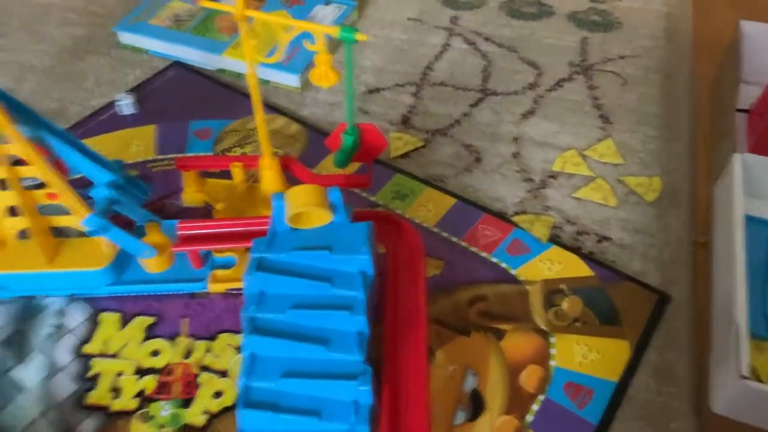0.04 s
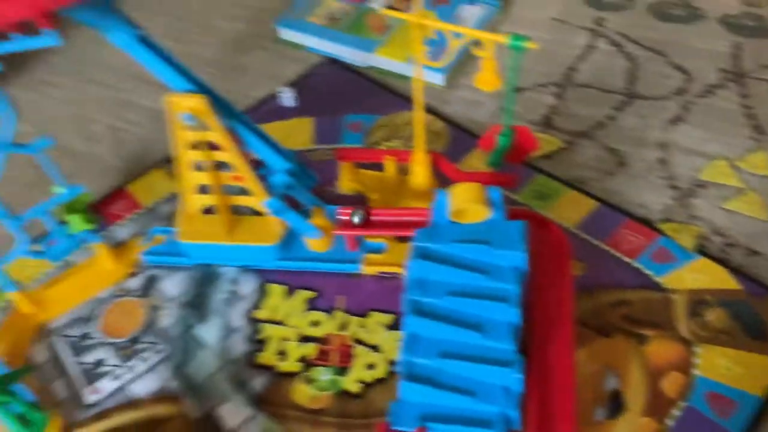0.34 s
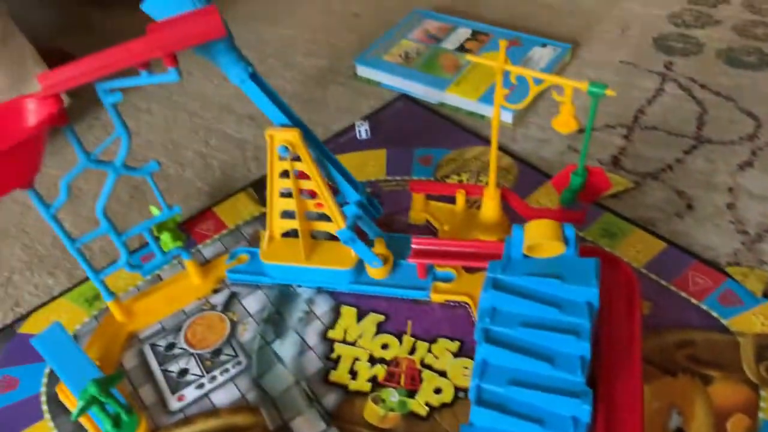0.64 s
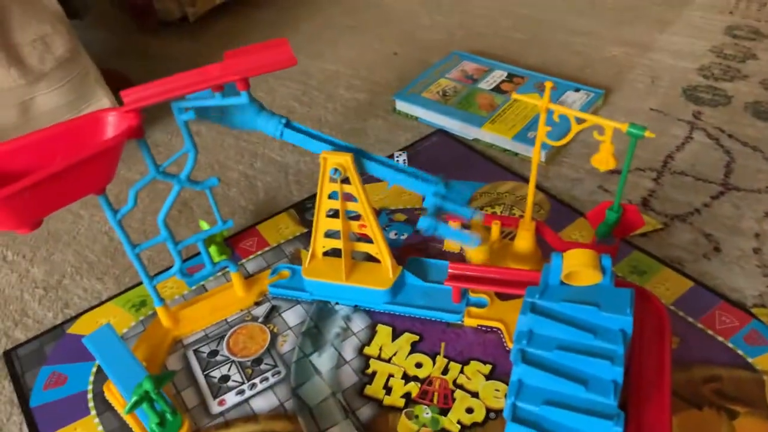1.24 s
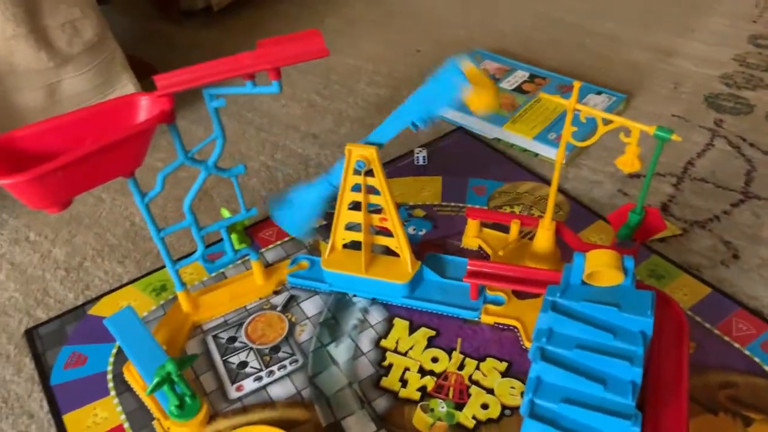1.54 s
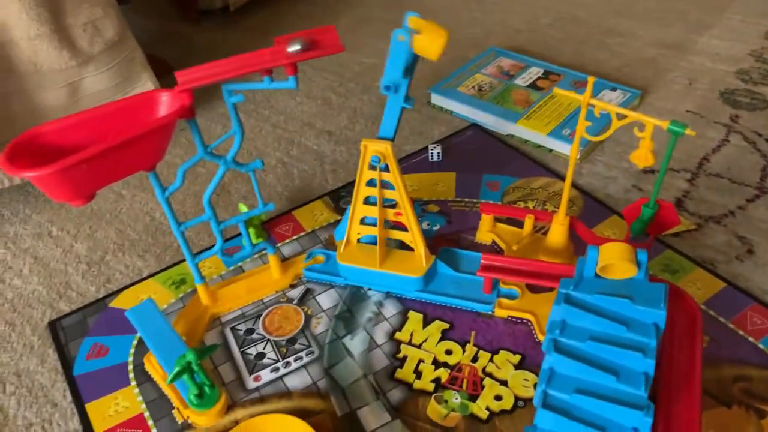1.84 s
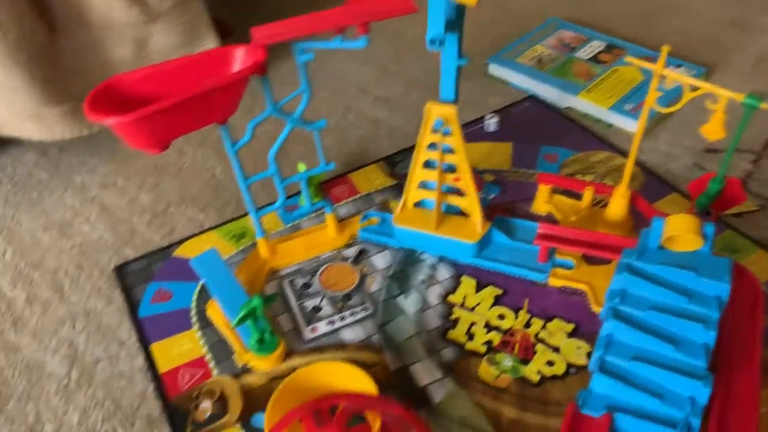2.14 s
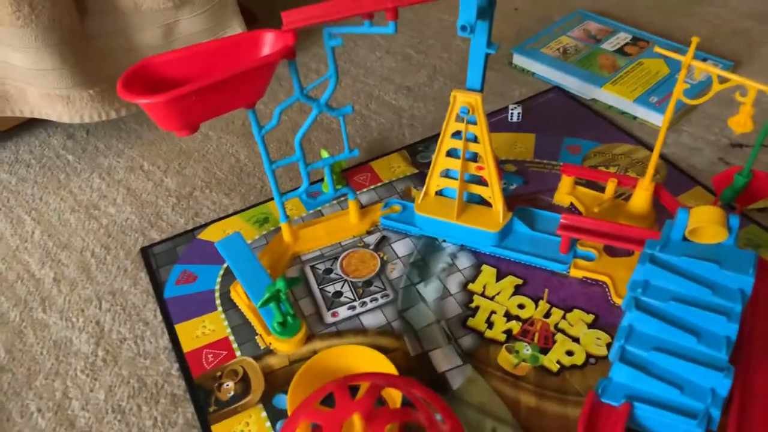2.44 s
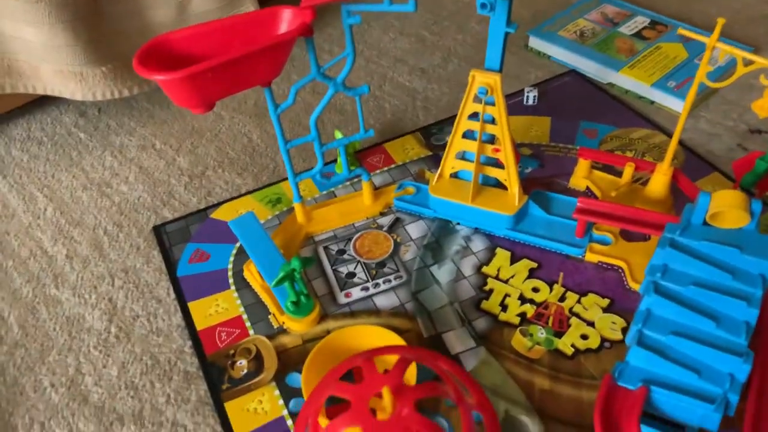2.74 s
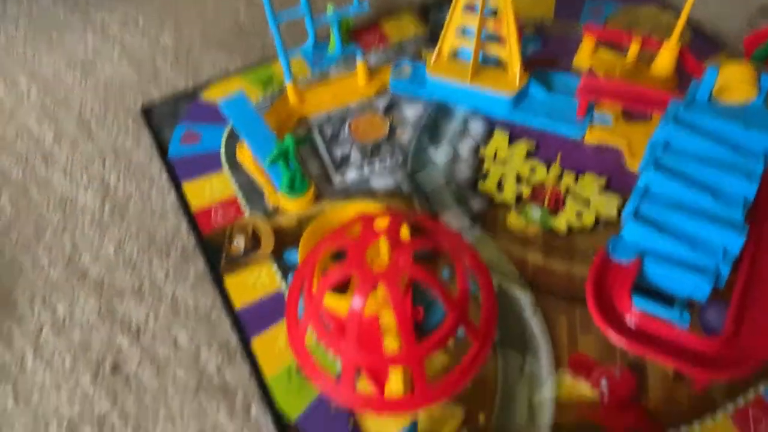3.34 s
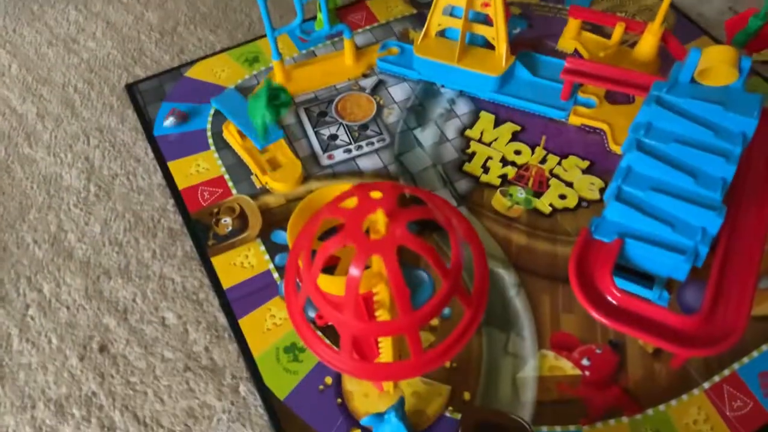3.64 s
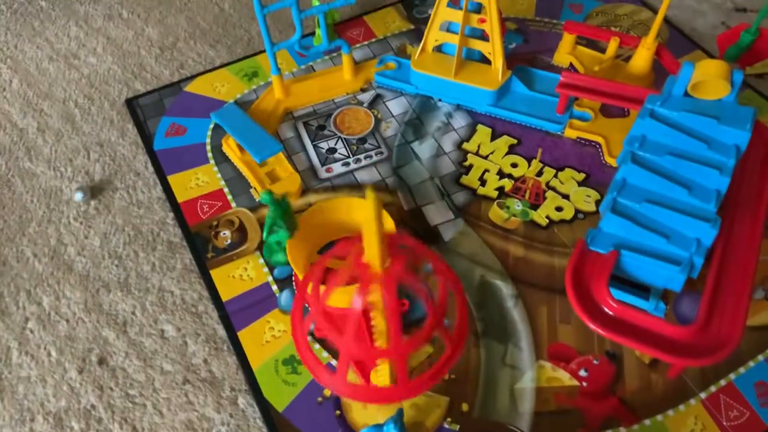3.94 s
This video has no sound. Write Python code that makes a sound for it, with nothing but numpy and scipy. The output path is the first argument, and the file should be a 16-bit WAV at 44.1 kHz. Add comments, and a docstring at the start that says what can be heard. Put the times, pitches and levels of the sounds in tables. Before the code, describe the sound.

Plastic clatter from a toy contraption on a game board: dull knocks and a short roll, light lever rattling, a ball bouncing and circling in a little tub, then a bright clack and a chattering cage. Close microphone, quiet room.

```python
"""Chain-reaction toy on a game board

A plastic toy runs its course in a quiet, carpeted room, heard on one microphone close by.
A steel ball knocks down a stair, rolls along a gutter and trips a lever, whose rattle tips a second
ball into a tub. That ball swirls, drops on a see-saw plank, and a cage chatters down its post.
Knocks cross the board as falling chirps."""
import sys
import numpy as np
from scipy import signal
from scipy.fft import rfft, irfft
from scipy.io import wavfile
from scipy.ndimage import map_coordinates

SR = 44100
rng = np.random.default_rng(int(sys.argv[2]) if len(sys.argv) > 2 else 0)


def persist_wave(psi):
    """Save psi, clipped to +-1, as 16-bit WAV."""
    counts = np.round(np.clip(psi, -1, 1) * 32767).astype(np.int16)
    wavfile.write(sys.argv[1], SR, np.atleast_2d(counts).T)


N = 176400
BLOW_SIZE = 4096  # samples; a blow's onset lies an eighth of the way in


def undb(db):
    return 10 ** (np.asarray(db) / 20)


def unit_rms(x):
    return x / np.sqrt(np.mean(x ** 2))


def on_log(points, hz):
    """Read (frequency [Hz], value) points on a log-frequency axis."""
    p = np.array(points, float)
    return np.interp(np.log(np.maximum(hz, 1)), np.log(p[:, 0]), p[:, 1])


def freqs(size):
    return np.maximum(np.arange(size // 2 + 1) * SR / size, 1)


def colour(x, points):
    """Filter by (frequency [Hz], gain [dB]) points."""
    return irfft(rfft(x) * undb(on_log(points, freqs(len(x)))), len(x))


def walk(per_s):
    """Smooth random wandering with a spread near 1."""
    steps = rng.standard_normal(int(per_s * N / SR) + 2)
    return np.interp(np.arange(N) * per_s / SR, np.arange(len(steps)), steps)


def add(out, at_s, blow):
    """Mix in a blow with its onset at at_s."""
    i = int(at_s * SR) - len(blow) // 8
    a, b = max(i, 0), min(i + len(blow), max(i, N))
    out[a:b] += blow[a - i:b - i]


def voice(spectrum, edges_hz, band_db, lag_ms):
    """Give a blow its strength in three bands (rms over 10 ms); bending waves bring the lows late."""
    hz = freqs(BLOW_SIZE)
    low, high = (1 / (1 + (hz / edge) ** 8) for edge in edges_hz)
    out = 0
    for share, db in zip((low, high - low, 1 - high), band_db):
        band = spectrum * share
        out = out + band * undb(db) / np.sqrt(np.sum(irfft(band) ** 2) / (.01 * SR))
    phase = 4 * np.pi * lag_ms * (np.sqrt(hz / 1000) - hz / 4000)
    return np.roll(irfft(out * np.exp(-1j * phase)), BLOW_SIZE // 8)


def rolling(curve, rings, bumps_per_s, spread_db, top_hz):
    """Tiny bumps under a rolling or sliding contact excite the plastic's resonances."""
    t, hz = np.arange(N) / SR, freqs(N)
    bumps = (rng.random(N) < bumps_per_s / SR) * rng.standard_normal(N)
    bumps *= undb(spread_db * np.minimum(rng.exponential(size=N), 2))
    bumps *= undb(2.5 * walk(per_s=70))  # uneven pressure
    body = sum(undb(db) / (1 + 1j * (hz / f - f / hz) * f / width) for f, width, db in rings)
    sound = irfft(rfft(bumps) * body / (1 + (hz / top_hz) ** 4), N)
    drift = 1 + .04 * walk(per_s=10)  # resonances shift as the contact moves
    sound = map_coordinates(sound, [np.cumsum(drift)], mode="mirror")
    at_s, db = np.array(curve).T
    return unit_rms(sound) * undb(np.interp(t, at_s, db)) * (t > at_s[0] - .03) * (t < at_s[-1])


def accent(at_s, hz):
    """Extra dB for the modes that a blow's landing spot favours."""
    spots = [(1.671, 2110), (1.7625, 3850), (2.1935, 2150), (2.2986, 2150)]  # accented blows (time [s], favoured frequency [Hz])
    return sum(10 * np.exp(-(np.log(hz / f) / .13) ** 2) for s, f in spots if abs(s - at_s) < .005)


def clacks(hits, modes, crack_db, crack_s, lag_ms, detune, bounce_db):
    """Each hit is a crack of chattering contact plus the part's modes; two fainter bounces follow."""
    crack_colour = [(150, -4.5), (400, 4), (1000, 9.5), (2500, 10.5), (5000, 3), (8000, -2.5), (10500, -9),
                    (13000, -17), (16000, -37)]  # contact spectrum (frequency [Hz], gain [dB])
    t, out = np.arange(BLOW_SIZE) / SR, np.zeros(N)
    hz, db, t60 = np.array(modes, float).T[:, :, None]
    sign = (-1) ** np.arange(len(hz))[:, None]
    fade = np.clip(4 - 5 * t / t[-1], 0, 1)
    crack_envelope = np.exp(-t / crack_s) * np.minimum(t / .00034, 1)
    for at_s, *band_db in hits:
        for contact_db in (0, bounce_db, bounce_db * 1.5):
            weight, shift = rng.standard_normal((2, len(hz), 1))
            decays = undb(db + accent(at_s, hz) + 2.5 * weight - 60 * t / t60)
            partials = sign * decays * np.sin(2 * np.pi * hz * (1 + detune * shift) * t)
            ring = fade * partials.sum(axis=0)
            crack = colour(rng.standard_normal(BLOW_SIZE) * crack_envelope, crack_colour)
            spectrum = rfft(unit_rms(ring) + undb(crack_db) * unit_rms(crack))
            add(out, at_s, undb(contact_db) * voice(spectrum, (1100, 5000), band_db, lag_ms))
            at_s += rng.uniform(.003, .011)
    return out


def room_tone():
    """The room's quiet hum: steady noise, mostly bass."""
    spectrum = [(30, -25.5), (65, 0), (140, -3), (300, -11.5), (650, -21.5), (1200, -26), (2500, -27),
                (4500, -40.5), (10000, -44), (15000, -63)]  # hum (frequency [Hz], gain [dB])
    return undb(-56) * unit_rms(colour(rng.standard_normal(N), spectrum))


def gutter_roll():
    """The steel ball rumbles along the plastic gutter."""
    curve = [(0, -52), (.08, -49), (.16, -52.5), (.24, -52.5), (.33, -45.5), (.39, -61), (.45, -67),
             (.6, -74)]  # roll (time [s], level [dB])
    rings = [(600, 230, 15), (713, 140, 5), (1180, 70, 0.5), (1410, 110, 7), (2100, 160, 1)]  # gutter resonances (frequency [Hz], width [Hz], gain [dB])
    return rolling(curve, rings, bumps_per_s=3500, spread_db=2, top_hz=5000)


def board_knocks():
    """A gritty knock spreads into a falling chirp, echoes off the board's edge and ends in a boom."""
    # knocks, bands before the board's gain
    # (time [s], boom [dB], body [dB], tick [dB], bending-wave lag scale [ms], boom pitch [Hz])
    knocks = [(0.0855, -27.5, -34.5, -42, 5.1, 108), (0.1114, -17.5, -17.5, -24.5, 4.4, 109),
              (0.2635, -37, -42.5, -83, 5, 135), (0.2904, -27.5, -32.5, -40, 2.5, 76),
              (0.652, -29.5, -41, -55, 6, 109), (0.7645, -39, -43, -68, 5.7, 194),
              (0.7742, -31.5, -41, -63, 6.93, 139), (1.2056, -41.5, -48.5, -52.5, 4.5, 137),
              (3.2252, -30.5, -44.5, -43, 5, 95), (3.456, -32.5, -34, -28, 3.4, 71)]
    response = [(40, -5.5), (70, 5.5), (120, 7), (220, 8.5), (360, 16.5), (650, 6), (1000, -22),
                (1600, -15.5), (2700, -27.5), (4500, -35.5), (8000, -44.5), (15000, -61)]  # board response (frequency [Hz], gain [dB])
    gain_db, boom_t60_s, echo_s = -2, .07, .0082
    t, hz, out = np.arange(BLOW_SIZE) / SR, freqs(BLOW_SIZE), np.zeros(N)
    grit_lowpass = signal.butter(1, 600, fs=SR, output="sos")
    echo_lowpass = signal.butter(2, 190, fs=SR, output="sos")
    for at_s, boom_db, body_db, tick_db, lag_ms, boom_hz in knocks:
        boom = undb(-44.5 - 60 * t / boom_t60_s) * np.cos(2 * np.pi * boom_hz * t)
        grit = signal.sosfilt(grit_lowpass, rng.standard_normal(BLOW_SIZE)) * np.exp(-t / .012)
        spectrum = rfft((t == 0) + boom + undb(-31) * grit) * undb(on_log(response, hz))
        top_hz = 11000 * undb((tick_db + 25) / 2)  # softer knocks are duller
        spectrum /= 1 + (hz / top_hz) ** 2
        knock = voice(spectrum, (220, 1000), (boom_db, body_db, tick_db), lag_ms)
        add(out, at_s, knock)
        add(out, at_s + echo_s, undb(-25.5) * signal.sosfilt(echo_lowpass, knock))
    return out * undb(gain_db)


def lever_trip():
    """The ball clicks against the end of the lever."""
    hits = [(0.4063, -59, -62, -60), (0.4285, -51, -57, -45.5), (0.4397, -42.5, -27.5, -34)]  # clicks (time [s], low [dB], middle [dB], treble [dB])
    modes = [(730, -16, .02), (1130, -16, .018), (1560, -13, .016), (2300, -6, .012), (3050, -6, .009),
             (3750, -1, .009), (4300, 0, .008), (4750, -5, .008)]  # lever end (frequency [Hz], gain [dB], t60 [s])
    return clacks(hits, modes, crack_db=-19, crack_s=.0012, lag_ms=.4, detune=.0014, bounce_db=-22.5)


def lever_rub():
    """Plastic parts rub as the lever takes the load."""
    curve = [(.63, -73), (.655, -50), (.71, -65.5), (.745, -84), (.78, -54), (.82, -99)]  # rub (time [s], level [dB])
    rings = [(2010, 1300, 8.5), (4750, 1100, -9), (6500, 2300, -13)]  # plastic resonances (frequency [Hz], width [Hz], gain [dB])
    return rolling(curve, rings, bumps_per_s=1500, spread_db=3, top_hz=8000)


def lever_rattle():
    """The lever rattles in its tower."""
    hits = [(0.7445, -55, -52.5, -61), (0.8313, -48.5, -53, -67), (0.8632, -53, -48, -67),
            (0.9261, -48, -57, -84.5), (0.939, -59.5, -57, -81), (0.98, -48.5, -47.5, -67),
            (0.987, -55.5, -49.5, -82), (1.0099, -56, -53.5, -78), (1.0318, -59, -55.5, -70),
            (1.0593, -64, -57, -75), (1.5227, -72, -48, -60.5), (1.5876, -52, -50.5, -66.5),
            (1.639, -52, -40, -49.5), (1.671, -45.5, -32.5, -45.5), (1.685, -50, -48.5, -55),
            (1.711, -57, -41.5, -54), (1.718, -52, -53, -57.5), (1.7422, -58.5, -48, -52.5),
            (1.7631, -43, -29, -42), (1.7825, -53.5, -43, -46.5), (1.797, -46, -52.5, -56),
            (1.805, -48.5, -42.5, -55.5), (1.831, -51.5, -47, -58.5), (1.858, -57.5, -47, -59.5),
            (1.9108, -47.5, -45, -58), (2.0435, -52.5, -51.5, -68.5)]  # rattle (time [s], low [dB], middle [dB], treble [dB])
    modes = [(580, -9, .012), (790, -11, .01), (1380, -8, .013), (2150, -7, .011), (2900, -6, .008),
             (3500, -4, .008), (4050, -3, .007), (4900, -10, .005), (6500, -9, .005)]  # lever (frequency [Hz], gain [dB], t60 [s])
    return clacks(hits, modes, crack_db=-2, crack_s=.002, lag_ms=.55, detune=.04, bounce_db=-15)


def tub_bounces():
    """The second ball bounces in the tub and sets it ringing."""
    hits = [(2.1378, -29, -14, -27), (2.1935, -40.5, -26, -44), (2.211, -45.5, -39, -51),
            (2.2395, -34.5, -30.5, -44.5), (2.2545, -37, -44, -63), (2.265, -53, -41, -58),
            (2.2986, -40.5, -27, -51.5), (2.335, -52, -44, -60), (2.346, -48.5, -40, -62),
            (2.7077, -52.5, -52.5, -90), (3.0594, -51, -58.5, -73)]  # bounces (time [s], low [dB], middle [dB], treble [dB])
    modes = [(750, -15, .022), (1000, -13, .012), (1300, -5, .014), (1450, 0, .017), (1660, -6, .014),
             (2120, -9, .016), (2750, -12, .01), (4600, -11, .004), (7900, -9, .003)]  # tub (frequency [Hz], gain [dB], t60 [s])
    return clacks(hits, modes, crack_db=-7, crack_s=.0013, lag_ms=1.2, detune=.018, bounce_db=-26)


def tub_swirl():
    """The ball rolls in circles round the tub."""
    curve = [(2.3, -50.5), (2.55, -99), (2.95, -69), (3.07, -68.5), (3.16, -77), (3.2, -53), (3.24, -45),
             (3.31, -49), (3.36, -45.5), (3.42, -51.5), (3.48, -59.5), (3.54, -53.5), (3.6, -94)]  # swirl (time [s], level [dB])
    rings = [(440, 320, 27), (900, 370, 22), (1350, 310, 18), (2130, 200, 21), (2730, 170, 2.9)]  # tub resonances (frequency [Hz], width [Hz], gain [dB])
    return rolling(curve, rings, bumps_per_s=4000, spread_db=3, top_hz=8500)


def drain_taps():
    """The circling ball taps the tub's drain."""
    hits = [(3.2066, -46, -50, -83), (3.3492, -47, -42, -81), (3.364, -52, -40.5, -64),
            (3.3807, -68, -37.5, -75.5), (3.4096, -48, -42, -67)]  # taps (time [s], low [dB], middle [dB], treble [dB])
    modes = [(1400, 0, .014), (2280, 0, .009), (2690, -2, .007)]  # drain (frequency [Hz], gain [dB], t60 [s])
    return clacks(hits, modes, crack_db=-8, crack_s=.004, lag_ms=1, detune=.03, bounce_db=-8)


def ball_landing():
    """The ball lands on the see-saw with a bright clack."""
    hits = [(3.5295, -27, -26, -18.5)]  # impact (time [s], low [dB], middle [dB], treble [dB])
    modes = [(700, 0, .02), (980, 1.5, .016), (1515, 0, .016), (2250, -2, .014), (3620, -1, .012),
             (5060, 3, .012), (5030, -27, .2), (6150, -10, .008), (8500, -4, .006), (11000, -7, .004),
             (12500, -6, .004)]  # ball on see-saw (frequency [Hz], gain [dB], t60 [s])
    return clacks(hits, modes, crack_db=-3, crack_s=.0028, lag_ms=.74, detune=.0029, bounce_db=-34)


def plank_clatter():
    """The see-saw and its thrown figure clatter on the board."""
    hits = [(3.561, -17.5, -21.5, -36.5), (3.602, -32.5, -44.5, -64), (3.7546, -34, -28, -30),
            (3.7675, -34, -48, -42), (3.787, -48, -40.5, -53), (3.8, -38, -59, -64),
            (3.8137, -36, -43.5, -62), (3.829, -40, -54, -72), (3.853, -41.5, -49.5, -62),
            (3.998, -28.5, -33.5, -52.5)]  # clatter (time [s], low [dB], middle [dB], treble [dB])
    modes = [(480, -4, .016), (690, -2, .014), (920, 0, .016), (1400, -2, .014), (1700, -5, .014),
             (2120, -1, .016), (3480, -11, .018), (6500, -17, .006)]  # plank (frequency [Hz], gain [dB], t60 [s])
    return clacks(hits, modes, crack_db=-1, crack_s=.0024, lag_ms=.96, detune=.05, bounce_db=-24)


def cage_chatter():
    """The cage knocks against its post on the way down."""
    hits = [(3.9095, -32, -40, -37.5), (3.916, -31.5, -36.5, -43.5), (3.937, -68, -58, -64),
            (3.9583, -39, -45, -49), (3.97, -58, -56, -58), (3.9803, -42, -50, -68)]  # chatter (time [s], low [dB], middle [dB], treble [dB])
    modes = [(652, -1, 0.041), (860, -5.5, 0.03), (3380, 7.5, 0.015), (4050, 5, 0.014), (4780, 1.5, 0.0087),
             (5760, -13, 0.013)]  # cage (frequency [Hz], gain [dB], t60 [s])
    return clacks(hits, modes, crack_db=-7, crack_s=.002, lag_ms=1.84, detune=.044, bounce_db=-15.5)


def room(x):
    """Quick reflections off the board and toy reach the microphone, then the room's diffuse tail."""
    decay_times = [(100, 0.45), (800, 0.41), (5000, 0.36), (14000, 0.28)]  # reverberation (frequency [Hz], t60 [s])
    room_colour = [(60, -15.5), (200, -2), (500, -3.5), (1000, -6.5), (2000, -8.5), (4000, -11.5),
                   (8000, -10.5), (15000, -10)]  # reflected sound (frequency [Hz], gain [dB])
    first_echo_s, early_t60_s = .0034, .082
    t, hz = np.arange(SR // 2) / SR, freqs(SR // 2)
    noise, tail = rfft(rng.standard_normal(len(t))), 0
    for band_hz, t60 in decay_times:
        share = on_log([(f, f == band_hz) for f, _ in decay_times], hz)
        tail = tail + irfft(noise * share, len(t)) * undb(-60 * t / t60)
    tail *= np.clip(t / first_echo_s - 1, 0, 1)
    early = rng.standard_normal(len(t)) * undb(-60 * t / early_t60_s) * np.clip(t / first_echo_s, 0, 1)
    response = colour(unit_rms(tail) + undb(-2) * unit_rms(early), room_colour) / np.sqrt(len(t))
    return signal.fftconvolve(x, response * (1 - t / t[-1]) ** .1)[:N]


def scene():
    """At the microphone: each part direct and with its own share of room, over the hum."""
    # (sound, room send [dB])
    parts = [(lever_trip(), -2), (lever_rattle(), -1), (tub_bounces() + drain_taps(), -3),
             (ball_landing(), -6.5), (plank_clatter(), -3), (cage_chatter(), 0),
             (gutter_roll() + tub_swirl() + lever_rub(), -1), (board_knocks(), -17)]
    direct = sum(sound for sound, _ in parts)
    sent = sum(sound * undb(send_db) for sound, send_db in parts)
    return (direct + room_tone() + room(sent))[None]


def record(dry):
    """The microphone drops the deep bass, rounds the loudest peaks and cuts the top."""
    ceiling, top_hz = .9, 16300
    thinned = signal.sosfilt(signal.butter(4, 46, "high", fs=SR, output="sos"), dry)
    rounded = ceiling * np.tanh(thinned / ceiling)
    return signal.sosfilt(signal.ellip(8, .2, 70, top_hz, fs=SR, output="sos"), rounded)


dry = scene()
out = record(dry)
persist_wave(out)
```